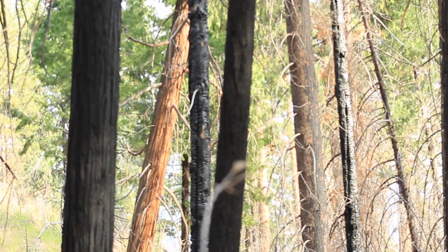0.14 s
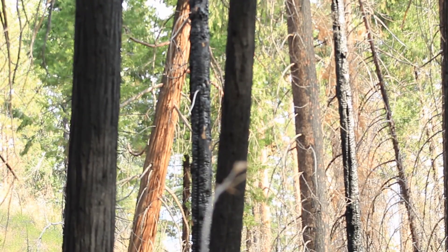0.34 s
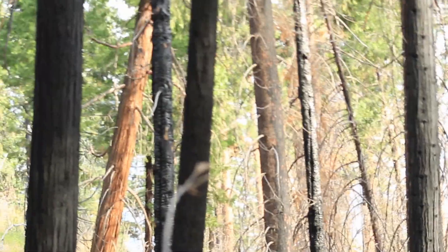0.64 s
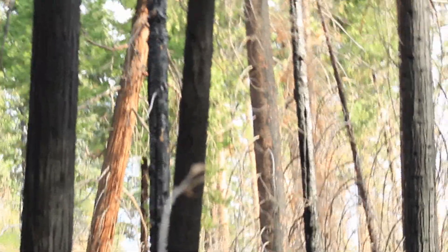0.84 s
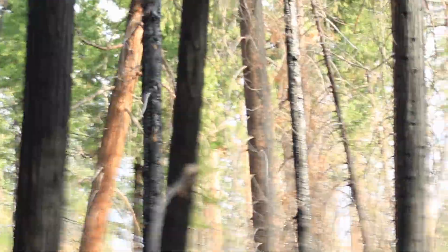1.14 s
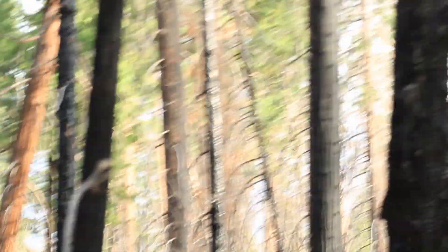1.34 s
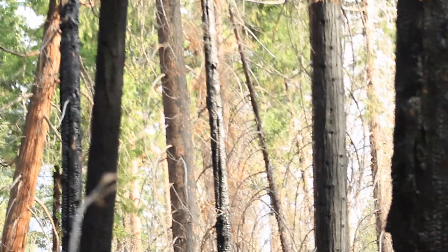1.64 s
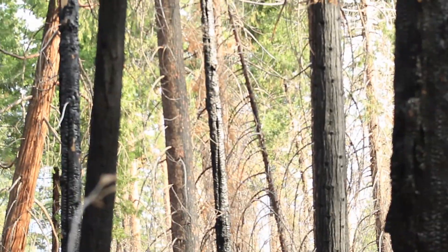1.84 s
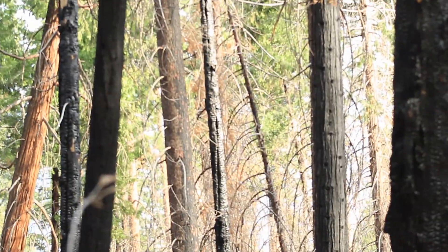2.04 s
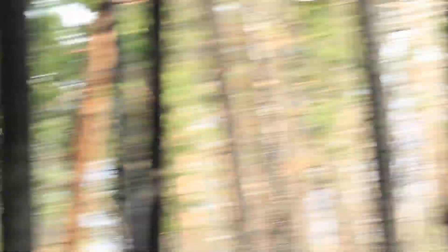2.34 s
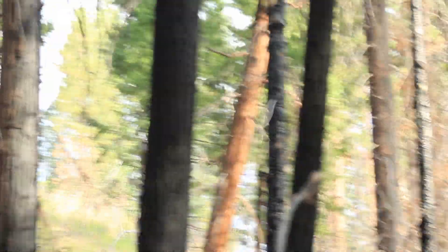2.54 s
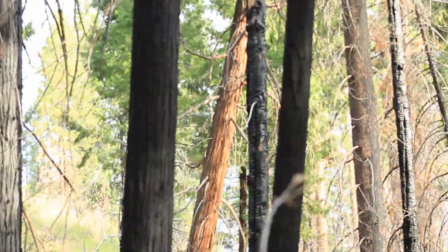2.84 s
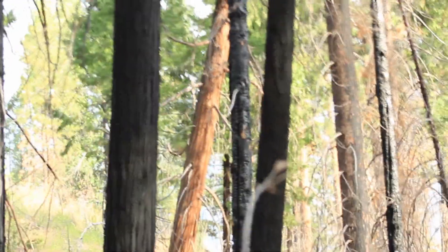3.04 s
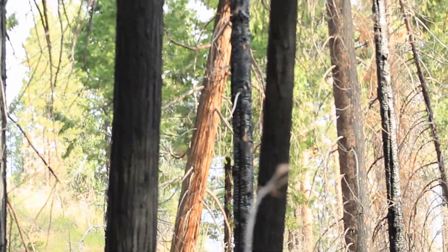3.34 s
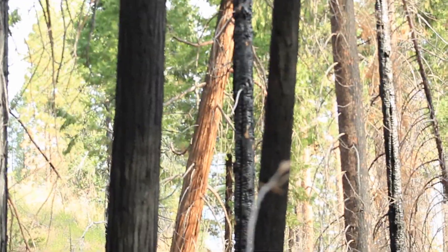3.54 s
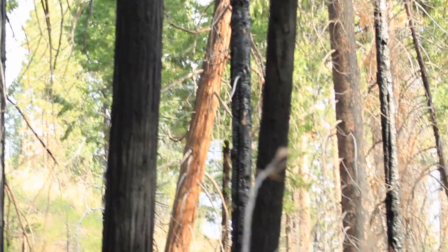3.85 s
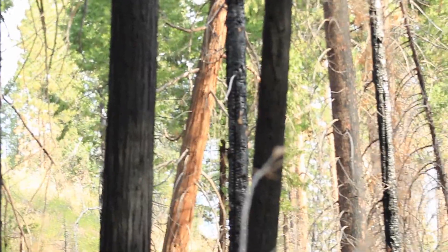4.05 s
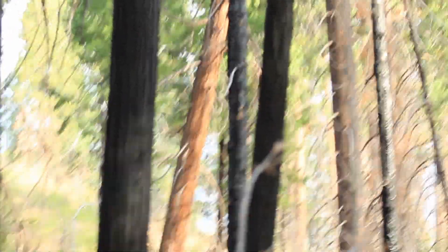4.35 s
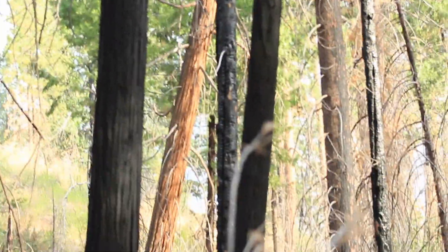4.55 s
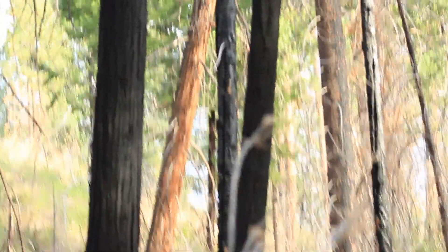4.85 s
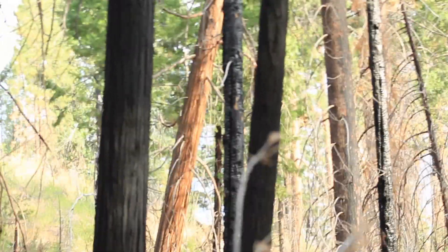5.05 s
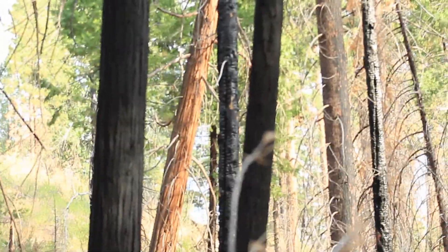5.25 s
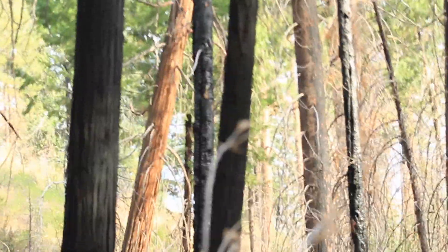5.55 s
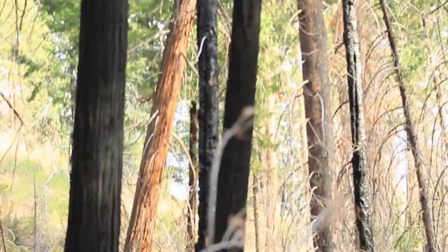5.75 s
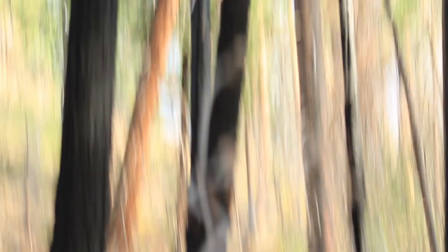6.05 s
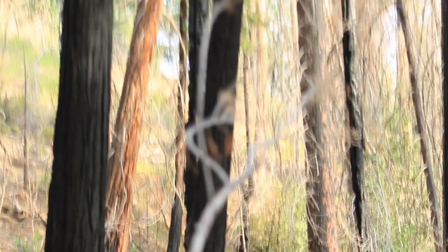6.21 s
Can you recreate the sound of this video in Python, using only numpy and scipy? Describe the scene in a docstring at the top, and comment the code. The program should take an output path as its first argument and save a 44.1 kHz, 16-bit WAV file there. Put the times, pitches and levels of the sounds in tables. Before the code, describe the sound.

A faint, steady hush fills a quiet grove. At about 0.5 seconds a sharp double click comes from a camera's plastic housing, very close, with a short scrape of a foot on dry litter and a light hiss of leaves. From 1 to 4 seconds there are scattered lighter clicks, dull knocks and ticks, with faint rattles of loose parts and soft, grainy shuffling of soles. From about 4.2 to 4.7 seconds a cluster of loud, sharp clicks rings the housing briefly. More hard clicks follow near 5 seconds, with a quick scrape, and from 5.2 to 5.4 seconds. The hardest overload the microphone, so the hush sinks and then climbs back. A last group of sharp clicks comes between 5.9 and 6.3 seconds, over a little more shuffling and scraping.

```python
"""Camera handling clicks in a grove

Someone shifts about on dry forest litter in a quiet grove, holding a camera. Sharp handling clicks,
knocks and light ticks ring its plastic housing; between them litter scrapes, leaves hiss, loose
parts rattle and soles shuffle. The hardest clicks overload the microphone and push the automatic
gain down, so the hush sinks and slowly returns."""
import sys
import numpy as np
from scipy import signal
from scipy.fft import rfft, irfft
from scipy.io import wavfile

SR = 44100
rng = np.random.default_rng(int(sys.argv[2]) if len(sys.argv) > 2 else 0)


def file_out(sig):
    """Save sig as 16-bit WAV at sys.argv[1]."""
    # one column per channel
    cols = np.atleast_2d(sig).T
    # limit, then scale
    lim = np.clip(cols, -1, 1)
    pcm = np.round(lim * 32767).astype(np.int16)
    wavfile.write(sys.argv[1], SR, pcm)


N = 281358
LEAD_S = .015   # a pulse starts this long before its click or tick


def from_db(db):
    """Turn decibels into a number to multiply by."""
    return 10 ** (np.asarray(db) / 20)


def coloured(x, spectrum):
    """Make some pitches stronger than others, then bring the average power to 1."""
    hz, db = np.transpose(spectrum)
    bins = np.maximum(np.fft.rfftfreq(len(x), 1 / SR), 1)
    gains = from_db(np.interp(np.log(bins), np.log(hz), db))
    shaped = irfft(rfft(x) * gains, len(x))
    return shaped / np.sqrt(np.mean(shaped ** 2) + 1e-20)


def resonance(x, hz, q, db):
    """Turn the pitches around hz up or down by db; a higher q makes the band narrower."""
    w = 2 * np.pi * hz / SR
    width, gain = np.sin(w) / (2 * q), np.sqrt(from_db(db))
    return signal.lfilter([1 + width * gain, -2 * np.cos(w), 1 - width * gain],
                          [1 + width / gain, -2 * np.cos(w), 1 - width / gain], x)


def drift(per_s):
    """Wander smoothly between random values, mostly within -1 to 1."""
    return np.interp(np.arange(N) / SR * per_s, np.arange(2048), rng.standard_normal(2048))


def grains(per_s, spread_db):
    """Tiny slips at random moments; more spread makes a few stand out from the rest."""
    sizes = from_db(spread_db * np.minimum(rng.exponential(1, N), 4))
    signs = rng.choice([-1, 1], N)
    return sizes * signs * (rng.random(N) < per_s / SR)


def strokes(rows, rest_db, attack_s=.006, easing_db=3.5, release_s=.025):
    """Loudness over time: each movement builds, eases off and dies away, over a faint steady stir."""
    power = np.full(N, from_db(rest_db) ** 2)
    for s, length, db in rows:
        start = int(s * SR)
        t = np.arange(min(SR, N - start)) / SR
        rise = np.minimum(t / attack_s, 1)
        hold = from_db(db - easing_db * np.minimum(t / length, 1))
        fade = np.exp(-np.maximum(t - length, 0) / release_s)
        power[start:start + len(t)] += (rise * hold * fade) ** 2
    return np.sqrt(power)


def click_pulses(count, before_db=-51, before_s=.0031, after_gain=.062, after_s=.0025):
    """A faint crackle leads into each sharp click, and a brief one follows it."""
    t = (np.arange(2048) - int(LEAD_S * SR)) / SR
    before = from_db(before_db) * np.exp(-np.abs(t) / before_s)
    after = after_gain * np.exp(-np.abs(t) / after_s)
    crackle = np.where(t < 0, before, after) * rng.standard_normal((count, len(t)))
    return (t == 0) + crackle


def add(track, s, pulse):
    """Mix a pulse into a track at s seconds."""
    part = track[int(s * SR):][:len(pulse)]
    part += pulse[:len(part)]


# The tone of the hush. Each row: pitch in Hz, relative level in dB.
HUSH_TONE = [(15, -37), (25, -17), (99, -1), (161, -8), (361, -0.5), (729, -0.5), (2030, -2), (2590, -9.5),
             (2810, -7.5), (3130, -0.5), (3780, -7), (4690, -7.5), (6840, -9.5), (13400, -24), (15800, -30)]

def grove_hush(level_db=-57.5):
    """The grove and the microphone make a faint, steady noise."""
    return from_db(level_db) * coloured(rng.standard_normal(N), HUSH_TONE)


# Drags of a foot. Each row: start in seconds, length in seconds, level in dB.
SCRAPES = [(0.435, 0.31, -44.5), (0.54, 0.064, -43), (0.77, .13, -51), (1.28, .07, -51), (1.52, 0.26, -53),
           (1.73, 0.084, -49.5), (2.03, 0.05, -53), (2.61, 0.042, -53.5), (3.28, 0.046, -60),
           (4.45, .04, -39.5), (4.94, 0.024, -32), (5.19, 0.12, -57), (5.66, 0.072, -50.5),
           (5.88, 0.073, -57.5), (6.14, 0.035, -42)]
# Their tone. Each row: pitch in Hz, relative level in dB.
SCRAPE_TONE = [(700, -20.5), (1500, -4), (2100, -10.5), (2700, 5.5), (3100, 2.5), (3600, -3.5), (4300, -7),
               (5200, -20.5), (9000, -33), (14000, -57)]

def litter_scrapes():
    """A foot drags over the litter in thousands of tiny slips."""
    return strokes(SCRAPES, rest_db=-70.5) * coloured(grains(per_s=8000, spread_db=.5), SCRAPE_TONE)


# Brushes against leaves. Each row: start in seconds, length in seconds, level in dB.
BRUSHES = [(0.45, 0.18, -56), (0.69, 0.35, -65), (1.72, 0.036, -59), (3.4, 0.038, -63), (4.14, 0.031, -60),
           (4.36, 0.067, -49), (4.455, 0.014, -37), (4.94, 0.035, -46), (5.18, 0.24, -70),
           (6.14, 0.048, -55)]
# Their tone. Each row: pitch in Hz, relative level in dB.
LEAF_TONE = [(2000, -17.5), (4500, -6.5), (5300, 1.5), (6900, 4.5), (7900, -2.5), (9500, -15.5),
             (11500, -24.5), (16000, -50.5)]

def leaf_hiss():
    """Dry leaves are brushed, and their tiny slips blur into a high hiss."""
    return strokes(BRUSHES, rest_db=-80) * coloured(grains(per_s=11000, spread_db=1), LEAF_TONE)


# Clicks and knocks from handling the camera. Each row: time in seconds, strength in dB, the click's
# pitch in Hz, boost of the low thud in dB, boost of the high sizzle in dB (below zero is a cut).
CLICKS = [(0.452, -4, 950, -2, 1), (0.4655, -4, 3440, 4.5, 6.5), (0.8087, -32, 1400, 1, 6),
          (0.941, -32.5, 1450, 16, 11), (1.1803, -27, 1600, 24.5, -17), (1.2041, -12.5, 2650, 15, 3),
          (1.272, -23, 1480, 20.5, -27), (1.354, -33.5, 1500, 34, -23), (1.3854, -29.5, 1500, 17, -21),
          (1.3935, -21, 1500, 22, -26), (1.4211, -40, 1400, 36, -19), (1.655, -16.5, 1500, 20.5, -16),
          (1.9899, -9.5, 3700, 16.5, 10), (2.3401, -28.5, 3500, 15, 9), (2.3577, -25, 2210, 22.5, -24),
          (2.3606, -11, 3440, 14.5, -3.5), (2.385, -37, 1000, 32, 0), (2.66, -33.5, 1320, 30, -6),
          (2.9919, -20, 3530, 18.5, 5.5), (3.298, -32.5, 1600, 20, 5), (3.4, -28.5, 1400, 6, 7.5),
          (3.6334, -12, 1690, 8, -10.5), (3.7815, -19, 1500, 14.5, 2.5), (3.9816, -21, 3550, 23, 11),
          (4.1876, 0.5, 2700, -3.5, 1.5), (4.2306, -7, 1830, 7, -2.5), (4.3143, 5.5, 3100, -3.5, -1),
          (4.3353, -1.5, 1500, 5.5, -14.5), (4.409, -24, 3500, 4, 5), (4.4193, -3.5, 3400, -6, -9),
          (4.484, 7, 3650, 0, -14.5), (4.561, -22, 3500, 10.5, -7), (4.5739, 8, 2680, -4, 0.5),
          (4.65, 7, 2600, -6, 1), (4.9398, -19, 1450, 14, 2), (4.9603, 4.5, 3700, 1, -8.5),
          (4.9793, -13.5, 3600, 21.5, 0), (5.0604, -32.5, 1015, 29, -1), (5.174, 0.5, 3650, -1, -8.5),
          (5.1948, -18, 1600, 19, -2), (5.2134, -30.5, 1400, 19, 11), (5.236, -28, 3600, 1, 3),
          (5.266, -26, 3700, 24.5, 7), (5.289, -35, 1400, 26, 14), (5.3144, -24.5, 1416, 18, 3),
          (5.3487, -22, 2500, 27.5, 6), (5.3533, 8, 3470, -12, -5), (5.3719, 2.5, 4000, 4.5, 9.5),
          (5.4043, -23, 1500, 24, -19), (5.704, -30, 3600, 10, -3), (5.863, -2, 1250, -2, 12),
          (5.9488, -37.5, 990, 27, -12.5), (6.02, -32, 3300, 9, 4.5), (6.051, -0.5, 3200, 9.5, 9),
          (6.0524, -2, 1550, 0.5, 14), (6.1026, -4, 1450, 9.5, -6.5), (6.14, -23.5, 1600, 20.5, -20),
          (6.2227, -10, 3700, -6, 3.5), (6.2525, -25, 1550, 19.5, -16)]

def housing_clicks():
    """Handling knocks the housing. Each click has its own pitch, low thud and high sizzle."""
    force = np.zeros(N)
    for (s, db, click_hz, thud_db, sizzle_db), pulse in zip(CLICKS, click_pulses(len(CLICKS))):
        pulse = resonance(pulse, hz=click_hz, q=4.1, db=5)
        pulse = resonance(pulse, hz=270, q=.4, db=thud_db)
        pulse = resonance(pulse, hz=6700, q=1, db=sizzle_db)
        add(force, s - LEAD_S, from_db(db) * pulse)
    return force


def contact(force, low_hz=110, high_hz=11500, gain_db=.5):
    """No knock is instant, so the highest treble is weak; the stiff little shell passes no deep bass."""
    band = signal.butter(2, [low_hz, high_hz], "band", fs=SR, output="sos")
    return from_db(gain_db) * signal.sosfilt(band, force + 1e-18)


# The notes the housing rings at. Each row: pitch in Hz, level in dB, seconds to fade by 60 dB.
HOUSING_NOTES = [(192.6, -36.5, 0.047), (307, -37.5, 0.025), (499, -41.5, 0.096), (587, -36, 0.049),
                 (890, -23, 0.024), (1000, -38, 0.15), (1105, -24.5, 0.032), (1397, -31.5, 0.081),
                 (1450, -25, 0.081), (1615, -15.5, 0.029), (1762, -28, 0.062), (1843, -21, 0.037),
                 (2150, -22.5, 0.05), (2339, -12, 0.034), (2577, -4, 0.016), (2783, -10, 0.021),
                 (2930, -23.5, 0.05), (3168, -17, 0.031), (3430, -13.5, 0.02), (3875, -15.5, 0.0084),
                 (4050, -28.5, 0.044), (4270, -18.5, 0.0081), (5710, -30.5, 0.019), (6307, -23.5, 0.013),
                 (7090, -25.5, 0.01), (8830, -31.5, 0.0077), (1239, -44, 0.23), (1486, -42.5, 0.28),
                 (3326, -47.5, 0.15), (3500, -44, 0.17)]

def housing_ring(force):
    """Each knock sets the camera's plastic shell ringing at many notes at once."""
    sound = np.zeros(len(force))
    for k, (hz, db, fade_s) in enumerate(HOUSING_NOTES):
        decay = np.exp(-np.log(1000) / (fade_s * SR))
        w = 2 * np.pi * hz / SR
        note = signal.lfilter([0, np.sin(w)], [1, -2 * decay * np.cos(w), decay ** 2], force + 1e-18)
        sound += (-1) ** k * from_db(db) * note   # flipping signs lets a knock swell for an instant
    return sound


# The tone of the lingering ring. Each row: pitch in Hz, relative level in dB.
AFTER_RING_TONE = [(150, -19), (500, -1.5), (1100, -15), (1500, 4), (1950, -13), (2300, 2.5), (3000, -20),
                   (3600, -6.5), (4200, -17), (7000, -25.5), (11000, -40), (16000, -57.5)]

def after_ring(force, gain_db=-43, fade_s=.24):
    """A faint, dense ring lingers behind each knock."""
    t = np.arange(16384) / SR
    fade = np.exp(-np.log(1000) * t / fade_s)
    tail = fade * coloured(rng.standard_normal(len(t)), AFTER_RING_TONE)
    return from_db(gain_db) * signal.fftconvolve(force, tail)[:N]


# Spells of rattling. Each row: start in seconds, length in seconds, level in dB.
RATTLES = [(0.52, 0.072, -45), (1.0, 0.049, -43.5), (1.16, 0.26, -58), (1.56, 0.21, -50.5),
           (1.73, .14, -51), (2.04, 0.054, -56), (2.58, 0.32, -59), (3.03, 0.085, -52.5),
           (3.33, .17, -53.5), (4.07, .04, -59)]
# Their tone. Each row: pitch in Hz, relative level in dB.
RATTLE_TONE = [(600, -41.5), (1200, -7.5), (1500, -6), (2050, -23.5), (2400, 3.5), (2600, 2), (2850, -11.5),
               (3400, -14), (4500, -38.5)]

def loose_rattles():
    """Loose parts rattle in a fine stream of tiny clicks."""
    return strokes(RATTLES, rest_db=-66.5) * coloured(grains(per_s=1800, spread_db=.5), RATTLE_TONE)


# Shuffles of a sole. Each row: start in seconds, length in seconds, level in dB.
SHUFFLES = [(0.88, 0.69, -59.5), (1.19, 0.15, -49), (1.33, 0.27, -52), (1.65, 0.087, -56),
            (2.0, 0.069, -59), (2.21, 0.021, -54.5), (2.37, 0.027, -47), (2.61, 0.077, -58.5),
            (3.0, 0.036, -54.5), (3.25, 0.11, -53.5), (4.95, 0.14, -58.5), (5.19, 0.15, -49.5),
            (5.87, 0.08, -55), (6.08, 0.2, -56.5)]
# Their tone. Each row: pitch in Hz, relative level in dB.
SHUFFLE_TONE = [(40, -24.5), (90, -13.5), (140, 0), (200, 0.5), (400, -3.5), (800, -4), (1500, -7),
                (2500, -42)]

def sole_shuffles():
    """A sole shuffles and takes weight with a dull, grainy sound."""
    return strokes(SHUFFLES, rest_db=-66.5) * coloured(grains(per_s=1400, spread_db=4), SHUFFLE_TONE)


def litter_crumbs(boost_db=14.5, dull_hz=900):
    """Small, dull bits of litter break at random under a shuffling sole."""
    breaks = from_db(boost_db) * strokes(SHUFFLES, rest_db=-75) * grains(per_s=82, spread_db=5)
    return signal.sosfilt(signal.butter(1, dull_hz, fs=SR, output="sos"), breaks + 1e-18)


# Light knocks on the housing. Each row: time in seconds, strength in dB.
TICKS = [(1.002, -7.5), (1.008, -20.5), (1.1805, -33), (1.3934, -20), (1.804, -23), (1.926, -26.5),
         (2.4536, -34), (2.5932, -30), (2.66, -34), (2.8243, -31.5), (3.1123, -32), (3.4107, -23),
         (3.4848, -30)]

def light_ticks(ping_hz=2600, width_hz=310):
    """Soft contacts wake one narrow band of pitches, so all have the same ping."""
    force = np.zeros(N)
    for (s, db), pulse in zip(TICKS, click_pulses(len(TICKS))):
        add(force, s - LEAD_S, from_db(db) * pulse)
    edges_hz = [ping_hz - width_hz / 2, ping_hz + width_hz / 2]
    return signal.sosfilt(signal.butter(1, edges_hz, "band", fs=SR, output="sos"), force + 1e-18)


def scene():
    """Mix the hush, the ringing knocks and the sounds of moving about into one channel."""
    hush = grove_hush()
    knocks = contact(housing_clicks() + light_ticks() + litter_crumbs())
    ringing = housing_ring(knocks) + after_ring(knocks)
    movement = loose_rattles() + litter_scrapes() + sole_shuffles() + leaf_hiss()
    uneven_pressure = from_db(2.7 * drift(per_s=27))
    return (hush + ringing + uneven_pressure * movement)[None]


def automatic_gain(x, threshold_db=-3.5, start_dip_db=5, react_s=.004, recovery_db_per_s=18):
    """Loud peaks quickly turn the volume down and it climbs back steadily; it also dips at the start."""
    over_db = np.maximum(20 * np.log10(np.abs(x) + 1e-9) - threshold_db, 0)
    climb_db = recovery_db_per_s * np.arange(N) / SR
    dip_db = np.maximum.accumulate(np.maximum(over_db + climb_db, start_dip_db), axis=-1) - climb_db
    lag = np.exp(-1 / (react_s * SR))
    smooth_dip_db = signal.lfilter([1 - lag], [1, -lag], dip_db)
    return x * from_db(-smooth_dip_db)


def record(dry):
    """The gain drops too late for the hardest peaks, which clip flat; rumble and top treble are cut."""
    rumble_hz, top_hz = 45, 15900
    clipped = np.clip(automatic_gain(dry), -1, 1)
    thinned = signal.sosfilt(signal.butter(1, rumble_hz, "high", fs=SR, output="sos"), clipped)
    return signal.sosfilt(signal.ellip(10, .1, 70, top_hz, fs=SR, output="sos"), thinned)


dry = scene()
out = record(dry)
file_out(out)
```